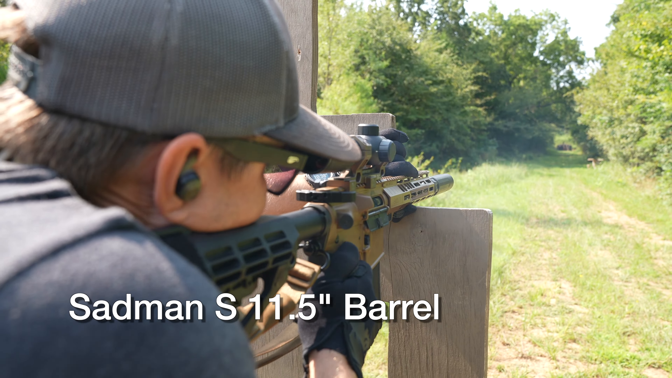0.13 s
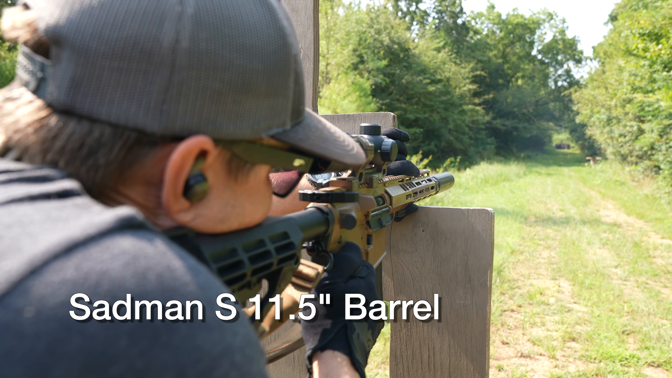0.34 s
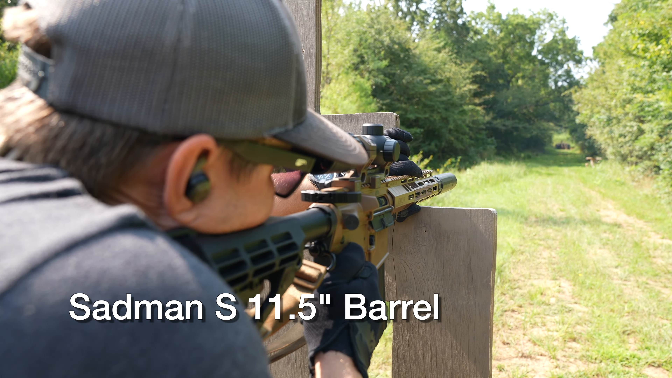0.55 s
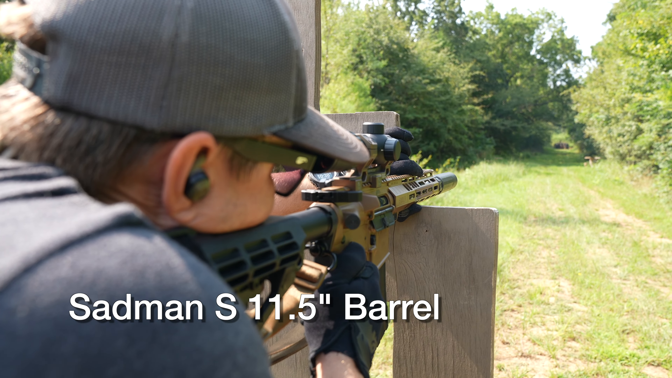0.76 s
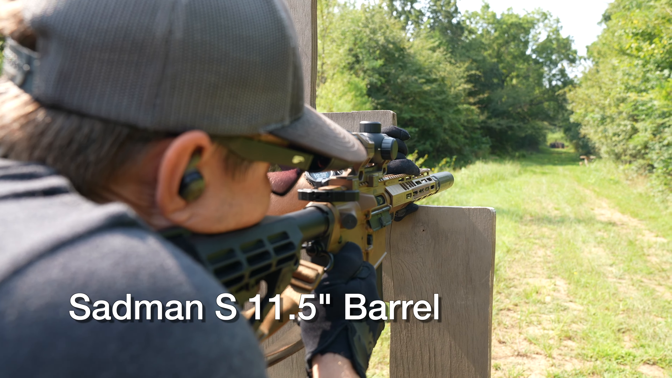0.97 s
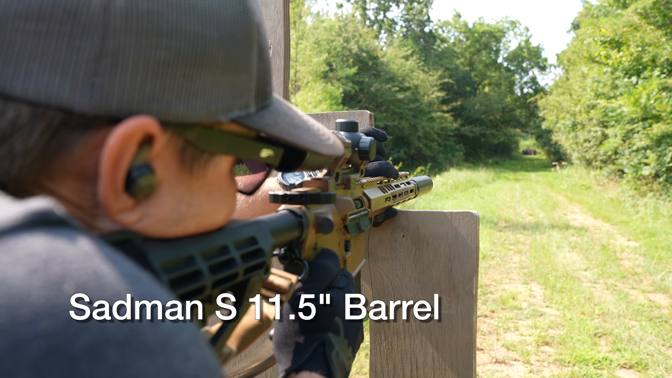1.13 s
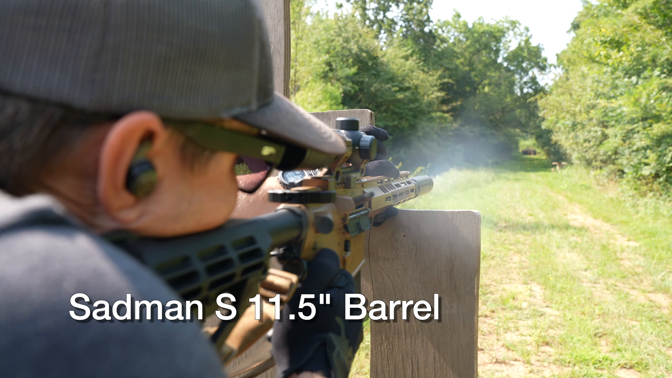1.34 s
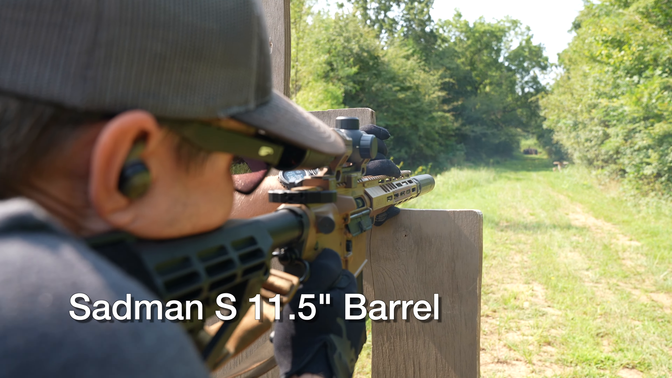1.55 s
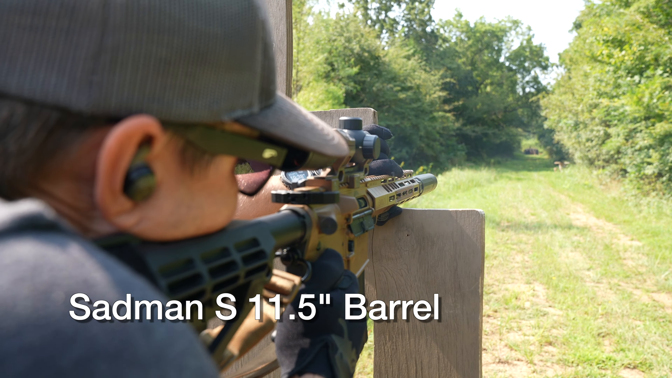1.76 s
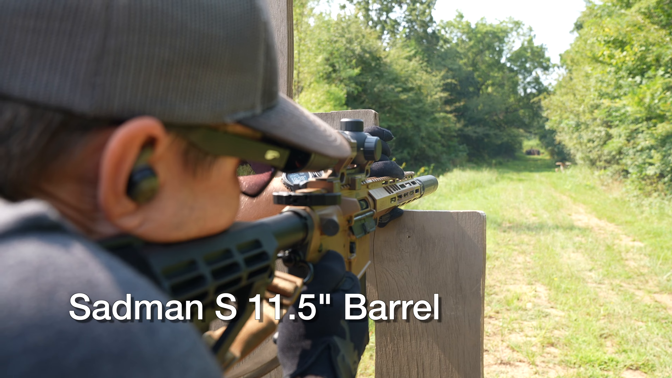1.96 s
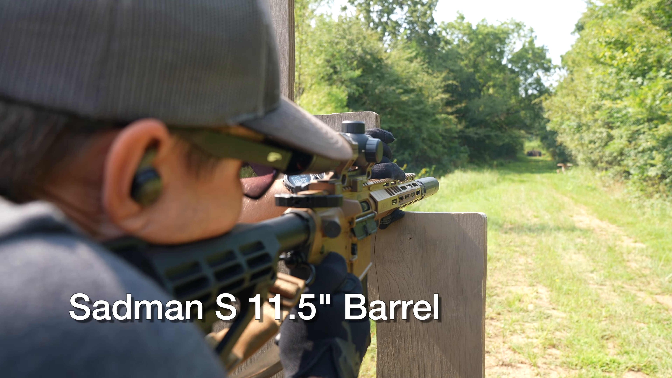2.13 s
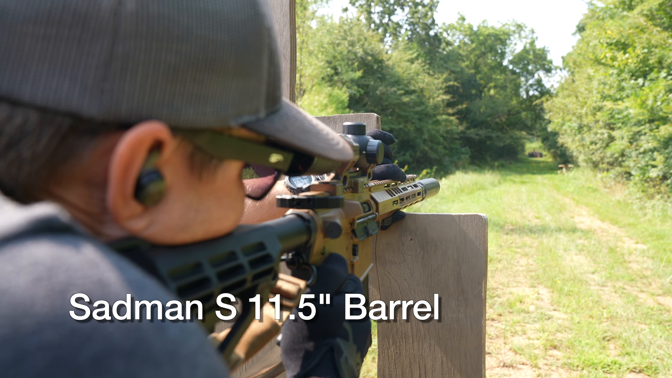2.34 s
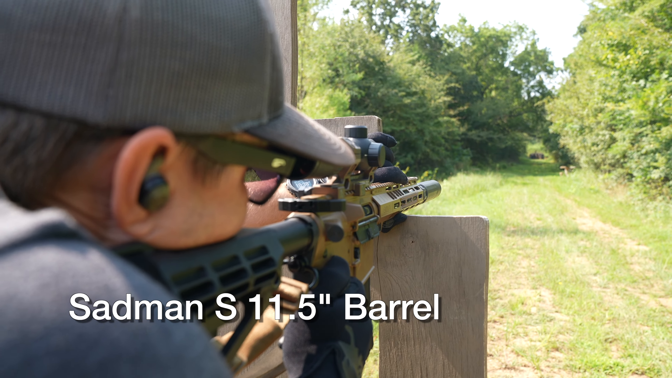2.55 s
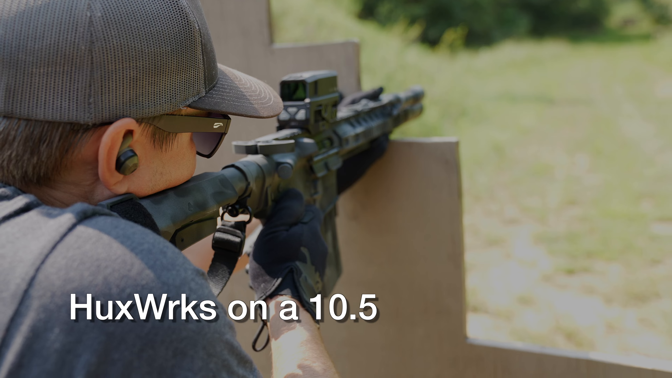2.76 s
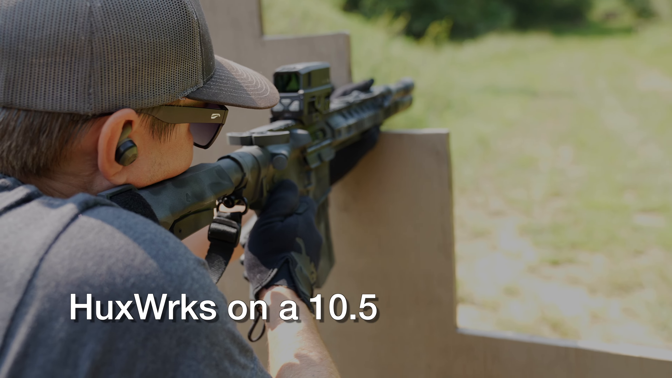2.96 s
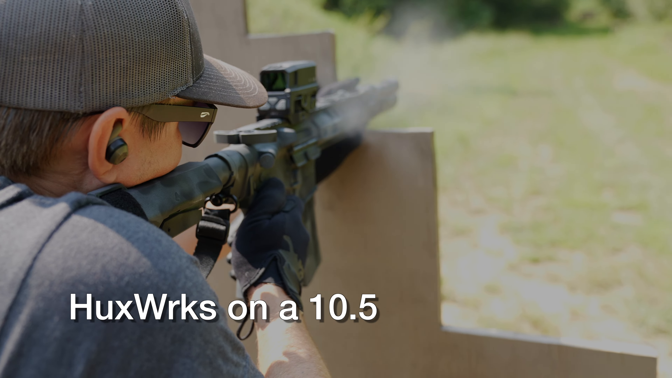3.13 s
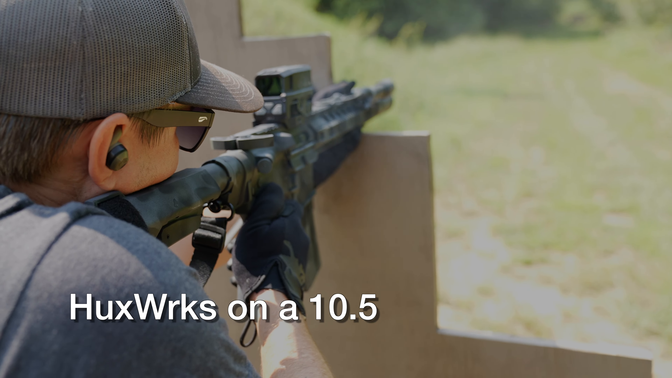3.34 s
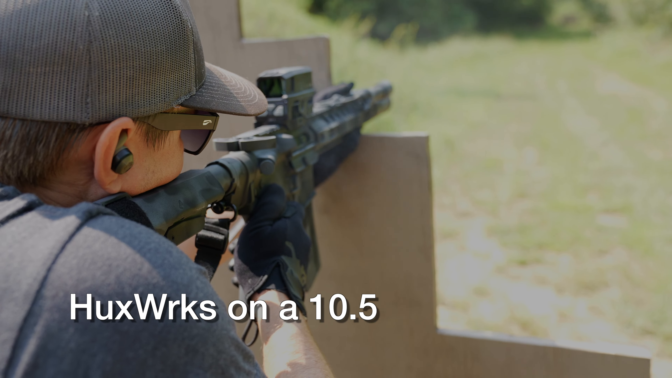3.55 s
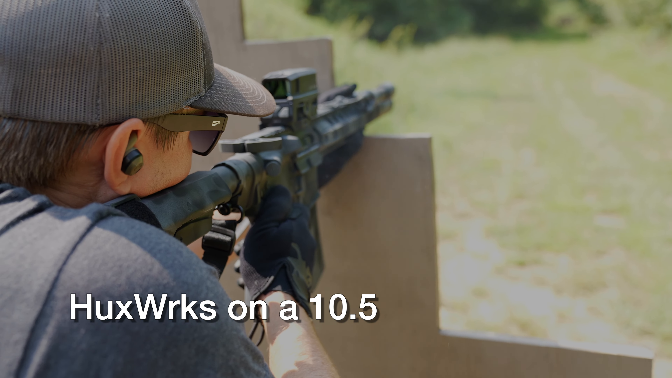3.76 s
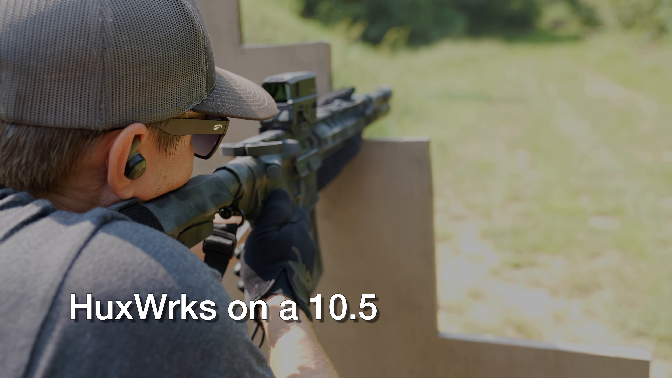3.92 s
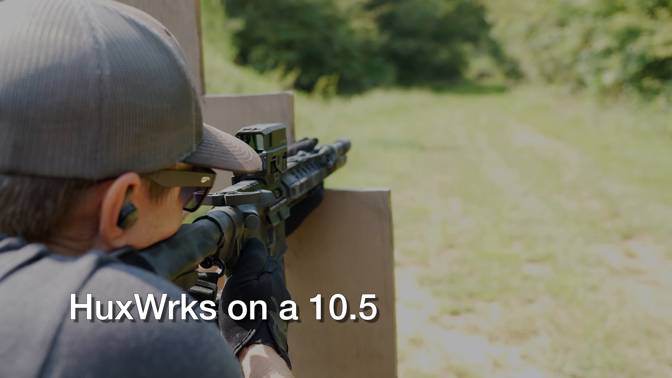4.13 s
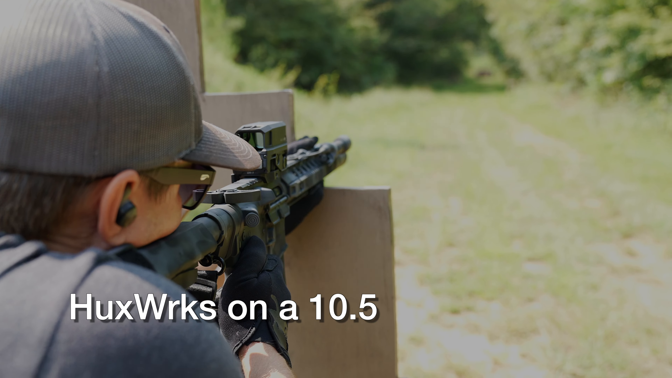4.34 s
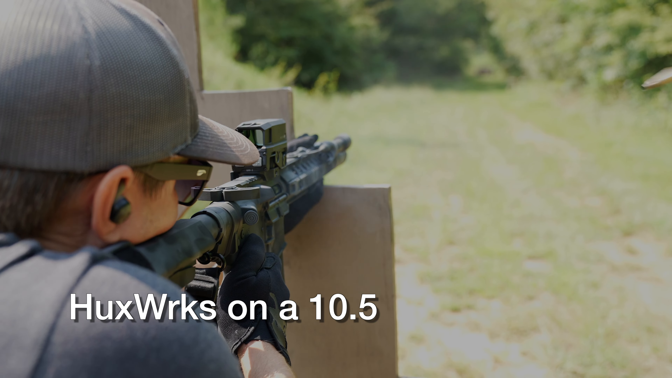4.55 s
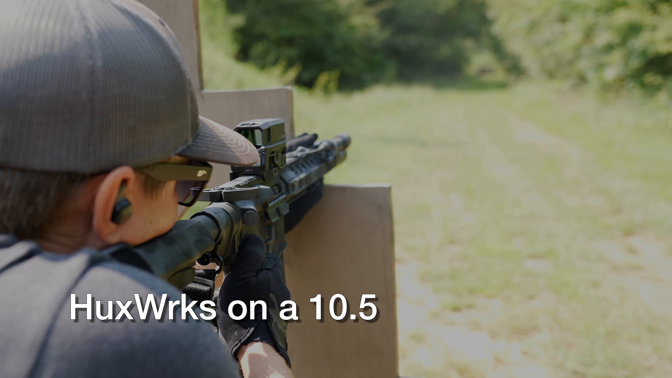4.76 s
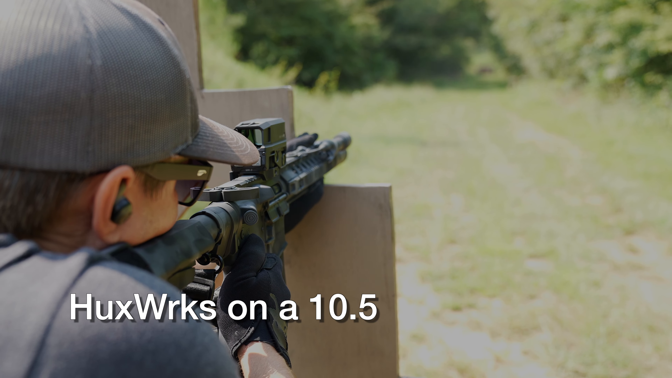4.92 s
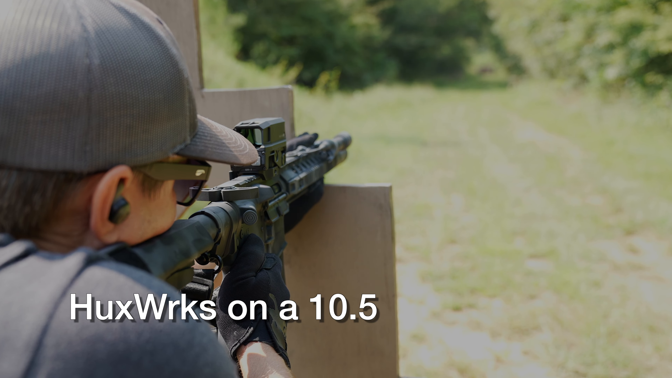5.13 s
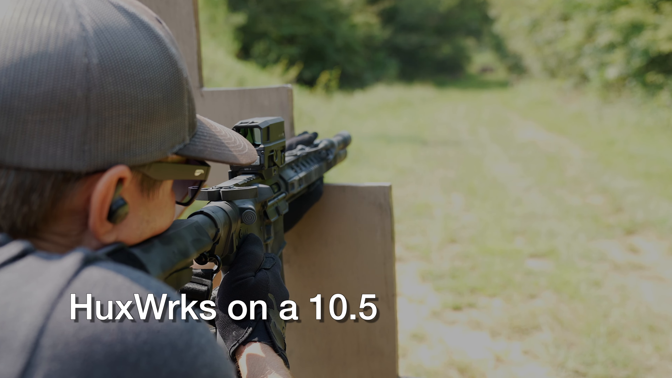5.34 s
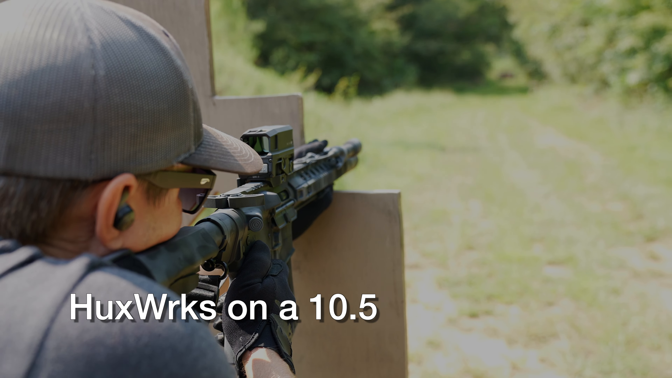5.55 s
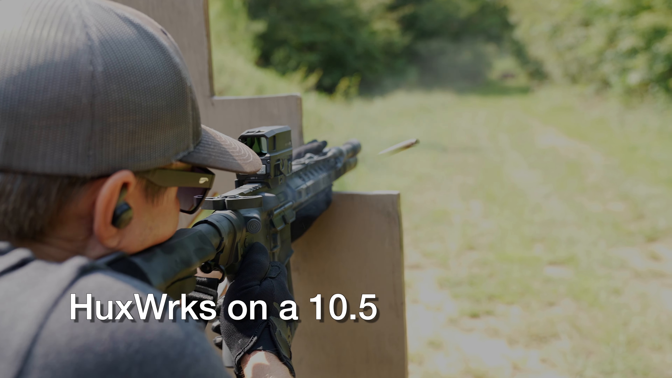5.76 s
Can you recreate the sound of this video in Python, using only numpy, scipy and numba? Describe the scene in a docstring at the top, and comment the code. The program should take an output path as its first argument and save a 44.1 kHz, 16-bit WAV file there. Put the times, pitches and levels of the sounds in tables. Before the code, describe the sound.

The tail of a shot is already hissing at the start, then a steel plate clangs. Four more sharp gunshots follow, over a second apart, each with a short thump and crackly tree echo; the next three echoes cut off abruptly. Plate hits answer all but the last. Mono, close, compressed microphone, thin insect buzz and light gusts.

```python
"""A suppressed rifle fires single shots on a grass range lined with trees; the first tail is already sounding.
After each blast, a burst of noise that saturates the microphone, the crack hisses back from the foliage.
A far steel plate then clashes and rings as a sum of decaying modes; past mid-scene a low rumble swells.
Insects and a little wind, both coloured noise, fill the pauses.
Automatic gain ducks under each blow and recovers in the tails."""
import sys
import numpy as np
from scipy import signal
from scipy.fft import rfft, irfft, next_fast_len
from scipy.io import wavfile
from numba import njit

SR = 44100
rng = np.random.default_rng(int(sys.argv[2]) if len(sys.argv) > 2 else 0)


def dump_mix(stems):
    """Bounce the given channels to the path in sys.argv[1] as a 16-bit WAV at rate SR."""
    frames = np.atleast_2d(stems).T  # one column per channel
    limited = np.clip(frames, -1, 1)  # hard clip at full scale
    pcm = np.round(limited * 32767).astype(np.int16)
    wavfile.write(sys.argv[1], SR, pcm)


N = 259734


def amp(db):
    """Decibel law: the amplitude ratio of a level in dB."""
    return 10 ** (np.asarray(db) / 20)


def unit(x):
    """Normalization: x scaled to an rms of 1."""
    return x / np.sqrt(np.mean(x ** 2) + 1e-20)


def clock():
    """Sampling: the time of every sample, in seconds."""
    return np.arange(N) / SR


def filtered(x, response):
    """Linear filtering: the spectrum of x times a gain that depends on frequency."""
    m = next_fast_len(N + 8192)
    gain = response(np.fft.rfftfreq(m, 1 / SR))
    return irfft(rfft(x, m) * gain, m)[:N]


def noise(spectrum, spiky_db=0):
    """Spectral shaping: noise of rms 1 in a given colour; spiky_db lets single impulses stand out."""
    frequency_hz, level_db = np.transpose(spectrum)
    impulses = rng.standard_normal(N) * amp(spiky_db * rng.standard_normal(N))

    def colour(hz):
        return amp(np.interp(np.log(hz + 1), np.log(frequency_hz), level_db))
    return unit(filtered(impulses, colour))


def fade(s, t60, attack):
    """Exponential decay: an envelope that rises from time s and falls 60 dB per t60 (all in s)."""
    age = np.maximum(clock() - s, 0)
    return (1 - np.exp(-age / attack)) * amp(-60 * np.minimum(age / t60, 5))


# colour of the wind: frequency_hz, level_db
WIND_COLOUR = [(20, 8.5), (45, -11.5), (80, -11.5), (120, -25), (250, -34.5), (700, -94)]
# colour of the low rumble: frequency_hz, level_db
RUMBLE_COLOUR = [(25, -1), (50, -16), (72, 2.5), (88, -2), (110, -29), (250, -51)]
# gusts on the microphone: centre_s, level_db, half_width_s
GUSTS = [(.38, -18, 0.12), (1.35, -35, 0.43), (2.83, -29, 0.094), (3.07, -17, 0.027), (3.35, -7.5, 0.25)]
BREEZE_DB = -30.5
RUMBLE_START_S, RUMBLE_END_S, RUMBLE_EDGE_S = 3.28, 4.14, 0.14
RUMBLE_DB, RUMBLE_SAG_DB_PER_S = -15.5, 10.5


def wind():
    """Turbulence noise: a light breeze with bell-shaped gusts, and one low rumble that swells and sinks."""
    t = clock()
    gusts = sum(amp(db) * np.exp(-((t - s) / width) ** 2) for s, db, width in GUSTS)
    strength = amp(BREEZE_DB) + gusts
    held = np.clip(np.minimum(t - RUMBLE_START_S, RUMBLE_END_S - t) / RUMBLE_EDGE_S, 0, 1)
    swell = held * amp(RUMBLE_DB - RUMBLE_SAG_DB_PER_S * (t - RUMBLE_START_S))
    return strength * noise(WIND_COLOUR) + swell * noise(RUMBLE_COLOUR)


# colour of the insect chorus: frequency_hz, level_db
INSECT_COLOUR = [(200, -22), (900, -21), (2000, -29.5), (2700, -13), (3400, 2.5), (4200, -6), (6000, -4.5),
                 (7700, -4), (9000, -16), (10500, -28), (13000, -23), (16000, -40)]
# colour of leaves and woods: frequency_hz, level_db
LEAF_COLOUR = [(60, -31), (150, -3), (400, -0.5), (800, 4.5), (1400, 8), (2200, -5.5), (5000, -31)]
# faint dull clicks as an echo stops: start_s, level_db
CLICKS = [(1.083, -33), (2.75, -30)]
# background levels, which change abruptly as each echo is cut short:
# end_s, chorus_level_db at the stretch's start, leaf_level_db
STRETCHES = [(1.085, -33.5, -61), (2.751, -31.5, -73), (4.168, -31, -64.5), (5.551, -35.5, -46.5),
             (5.9, -34, -44.5)]
CHORUS_FALL_DB_PER_S = 2.03  # the background chorus level falls a little through each stretch


def meadow():
    """Superposition of many small sources: insects and leaves as coloured noise, with faint clicks."""
    t, insects, leaves = clock(), noise(INSECT_COLOUR), noise(LEAF_COLOUR)
    clicks = sum(amp(db) * fade(s, t60=0.016, attack=0.00033) for s, db in CLICKS)
    out = noise(LEAF_COLOUR) * clicks
    start = 0
    for end, chorus_db, leaf_db in STRETCHES:
        chorus = amp(chorus_db - CHORUS_FALL_DB_PER_S * (t - start)) * insects
        out += (chorus + amp(leaf_db) * leaves) * ((t >= start) & (t < end))
        start = end
    return out


# the plate's modes: pitch_hz
MODE_HZ = [1475, 2713, 3135, 3569, 4168, 4381, 4463, 4962, 5367, 6025, 6648, 6756, 6928, 7171, 7590, 8236,
           9049, 9152, 10060, 10250, 10680, 11540, 12280, 13200, 13800, 14544]
# how they ring, in the same order: level_db, t60_s
MODE_DECAYS = [(-20, 0.29), (-4.5, 0.37), (-5.5, 0.21), (8, 0.13), (2, 0.29), (0, 0.26), (-4, 0.21),
               (7, 0.19), (2, 0.19), (-9, 0.2), (-2, 0.17), (-13, 0.29), (-11, 0.27), (1, .18),
               (-2.5, 0.23), (-3, 0.17), (-3, 0.26), (-16, 0.22), (-11.5, 0.3), (-12, 0.19), (-15, 0.31),
               (-19, 0.34), (-17, 0.28), (-17, .26), (-25, 0.22), (-17, .23)]
MID_MODE_HZ = 4000  # the pitch about which a blow's brightness tilts the modes
# the plate swings on its hanger, so each mode swells and sinks; the spread is a share of the rate
SWING_DB, SWING_HZ, SWING_SPREAD = 3.5, 7, .4


def ring(brightness_db, favoured_hz, favour_db, build_up, bloom_hz=5000, scatter_db=2):
    """Modal synthesis: a struck plate sounds as decaying sines, and the favoured modes stand out."""
    age = np.arange(SR * 3 // 4) / SR
    out = np.zeros(len(age))
    favoured = [min(MODE_HZ, key=lambda hz: abs(hz - near)) for near in favoured_hz]
    for hz, (db, t60) in zip(MODE_HZ, MODE_DECAYS):
        phase, side = rng.uniform(0, 2 * np.pi, 2)
        swing_hz = SWING_HZ * (1 + SWING_SPREAD * rng.uniform(-1, 1))
        struck_db = db + brightness_db * np.log2(hz / MID_MODE_HZ)
        struck_db += favour_db * (hz in favoured) + scatter_db * rng.standard_normal()
        lobes_db = SWING_DB * np.sin(2 * np.pi * swing_hz * age + side)  # the swing turns each mode's lobes
        rise_s = build_up * np.sqrt(hz / bloom_hz)  # energy reaches the high modes last
        rise = (1 - np.exp(-age / rise_s)) ** 2
        level = amp(struck_db + lobes_db - 60 * age / t60)
        out += rise * level * np.sin(2 * np.pi * hz * age + phase)
    return out


# colour of struck metal, also heard in the rifle's hammer: frequency_hz, level_db
METAL_COLOUR = [(100, -9), (1000, -12.5), (2000, -3.5), (3200, 0), (5000, -7), (9000, -17.5), (16000, -36)]
# colour of the clang scattered by the trees: frequency_hz, level_db
PLATE_ECHO_COLOUR = [(60, -26), (150, -8), (400, -2), (1200, 10.5), (2000, 9), (3300, 2.5), (6000, -7),
                     (12000, -32)]
# bullets reach the plate, and once it swings back against its hanger; the spot struck favours two modes:
# start_s, clash_level_db, clash_t60_s, ring_level_db, brightness_db_per_octave,
# favoured_pitch_hz, second_favoured_pitch_hz, favour_gain_db, build_up_s, echo_level_db
HITS = [(0.6448, 19.5, .019, 1, -0.5, 2713, 4381, 10.5, 0.065, -17.5),
        (2.1035, 12.5, 0.019, -9.5, -2, 4168, 4463, 4, 0.031, -19.5),
        (2.159, -7, 0.022, -20, -5, 2713, 4463, 16.5, 0.011, -33),
        (3.9018, 5.5, 0.06, -15.5, -6, 2713, 6928, 13.5, 0.019, -12.5),
        (5.1807, 12, 0.026, -11, -5, 3135, 10250, 14, 0.035, -13.5)]
# sharp ticks just ahead of the plate's clang: start_s, level_db
TICKS = [(0.642, 0), (2.1002, -5), (3.8964, 3.5), (5.177, -9)]


def plate():
    """Impact excitation: a bullet clashes on steel, the modes build up and ring, the trees scatter the clang."""
    out = np.zeros(N)
    clash, scatter = noise(METAL_COLOUR), noise(PLATE_ECHO_COLOUR)
    for s, clash_db, t60, ring_db, brightness_db, *favoured_hz, favour_db, build_up, echo_db in HITS:
        out += amp(clash_db) * clash * fade(s, t60=t60, attack=0.0072)
        out += amp(echo_db) * scatter * fade(s, t60=0.52, attack=0.0033)
        start = round(s * SR)
        tone = ring(brightness_db, favoured_hz, favour_db, build_up)
        out[start:start + len(tone)] += amp(ring_db) * tone[:N - start]
    for s, db in TICKS:
        out += amp(db) * clash * fade(s, t60=0.011, attack=0.00057)
    return out


# the crack returns from ever farther trees, weaker and duller
SPREAD_DB_PER_S, TREBLE_DB, DULLING_DB_PER_S = 23, 11.5, 29.5
# the echo's first moments are extra bright and harsh
EARLY_TREBLE_DB, EARLY_S = 17.5, 0.032
# where the tree line ends the echo falls away, and the woods behind it fade on
TREE_LINE_S, EDGE_S, EDGE_DB, BEYOND_DB_PER_S = .53, 0.19, 8.5, 25


def tree_line(age):
    """Spreading and absorption: level and treble (dB) of the crack that returns age seconds after the shot."""
    early, beyond = np.exp(-age / EARLY_S), np.maximum(age - TREE_LINE_S, 0)
    edge_db = EDGE_DB * np.minimum(beyond / EDGE_S, 1) + BEYOND_DB_PER_S * beyond
    level_db = -SPREAD_DB_PER_S * age - edge_db
    treble_db = TREBLE_DB + EARLY_TREBLE_DB * early - DULLING_DB_PER_S * age
    return level_db, treble_db


# colour of the returning crack: frequency_hz, level_db
CRACK_COLOUR = [(60, -19.5), (300, -19), (600, -12.5), (1100, -5), (2000, -3), (2900, -0.5), (3400, 4),
                (4100, -3.5), (6000, -11), (9000, -24), (16000, -31)]
# colour of the boom, in its echo and at the rifle: frequency_hz, level_db
BOOM_COLOUR = [(30, -22), (80, 12), (130, 6), (260, 4), (500, 5), (950, 6), (1300, -16), (3500, -11),
               (12000, -58)]
# larger obstacles return the boom: delay_s after the shot, level_db re the echo's bass
OBSTACLES = [(0.102, -10.5), (0.306, -18.5)]
ROLL_DB, ROLL_T60_S = -15, 2.175  # the far woods, before each shot's echo level is applied


def foliage(bass_hz=650, treble_hz=7000, crack_db=2, clump_db=0.82):
    """Diffuse scattering: leaves and trunks return tiny cracks; longer paths lose treble, far woods roll."""
    cracks, boom, woods = noise(CRACK_COLOUR, spiky_db=4.0), noise(BOOM_COLOUR), noise(LEAF_COLOUR)
    bass = filtered(cracks, lambda hz: 1 / (1 + (hz / bass_hz) ** 4))
    treble = filtered(cracks, lambda hz: 1 - 1 / (1 + (hz / treble_hz) ** 6))
    body, out, t = cracks - bass - treble, np.zeros(N), clock()
    for (s, *_, echo_db, bass_db), (end, *_) in zip(SHOTS, STRETCHES):
        level_db, treble_db = tree_line(np.maximum(t - s, 0))
        bands = body + amp(bass_db) * bass + amp(treble_db) * treble
        echo = amp(crack_db + level_db) * bands
        echo += amp(ROLL_DB) * woods * fade(s, t60=ROLL_T60_S, attack=0.79)
        for delay, db in OBSTACLES:
            echo += boom * amp(bass_db + db) * fade(s + delay, t60=0.12, attack=.005)
        out += amp(echo_db) * echo * ((t > s) & (t < end))
    clumps = unit(filtered(rng.standard_normal(N), lambda hz: np.exp(-hz / 90)))  # single trees stand out
    return out * amp(clump_db * clumps)


# colour of the muzzle blast: frequency_hz, level_db
BLAST_COLOUR = [(40, 2.5), (140, -21.5), (300, 7), (500, -5), (900, -3.5), (1500, -7.5), (3500, -14),
                (7000, -42), (16000, -10.5)]
# the shots: start_s at the muzzle, blast_level_db, boom_level_db, suction_level_db, suction_length_s,
# echo_level_db, echo_bass_db
SHOTS = [(-.115, 36, 6, 34, 0.096, 4, -1), (1.348, 37, 20.5, 32, .049, 3.5, 0),
         (3.1447, 46.5, 27, 40, 0.058, 3.5, 7.5), (4.424, 22, 18, 18, 0.041, 3, 6.5),
         (5.7059, 30.5, 28.5, 30.5, 0.035, 10, 8)]
HAMMER_DB, BLAST_T60_S = 13.5, 0.018


def rifle(lead=0.00602, hammer_attack=0.0048, bank_delay=0.016, bank_db=9):
    """Impulsive gas release: hammer falls, muzzle blasts, barricade booms, slow suction follows the gas."""
    steel, gas, wood, out = noise(METAL_COLOUR), noise(BLAST_COLOUR), noise(BOOM_COLOUR), np.zeros(N)
    for s, blast_db, boom_db, suction_db, length, *_ in SHOTS:
        out += amp(HAMMER_DB) * steel * fade(s - lead, t60=0.014, attack=hammer_attack)
        out += amp(blast_db) * gas * fade(s, t60=BLAST_T60_S, attack=0.0015)
        out += amp(boom_db) * wood * fade(s, t60=0.1, attack=0.00072)
        # the nearest surfaces answer first
        out += amp(bank_db) * steel * fade(s + bank_delay, t60=0.058, attack=0.012)
        progress = np.clip((clock() - s) / length, 0, 1)
        # a strong suction pins the microphone and mutes it briefly
        out -= amp(suction_db) * np.sin(np.pi * progress) * (1 - progress)
    return out


def scene():
    """Superposition: everything that reaches the one microphone."""
    return (rifle() + foliage() + plate() + meadow() + wind())[None]


@njit
def follow(size, start, attack, release):
    """Envelope detection: a level that rises quickly and sinks slowly (times in samples)."""
    out, level = np.empty_like(size), start
    for i in range(len(size)):
        level += (size[i] - level) / (attack if size[i] > level else release)
        out[i] = level
    return out


def clip(x, top, order):
    """Saturation: x bounded by +-top; a higher order is harder."""
    return x / (1 + np.abs(x / top) ** order) ** (1 / order)


GAIN_ATTACK_S, FULL_SCALE, TOP_HZ = .009, 1, 15500


def record(dry, rail_db=18, coupling_hz=20, target_db=-12, release=0.027):
    """Saturation and compression: the microphone limits, coupling drains the offset, gain levels, peaks clip."""
    mic = clip(dry[0], amp(rail_db), order=6)
    mic = signal.sosfilt(signal.butter(2, coupling_hz, "high", fs=SR, output="sos"), mic)
    size = np.abs(mic)
    level = follow(size, np.mean(size[:SR // 20]), GAIN_ATTACK_S * SR, release * SR)
    gain = clip(level + 1e-9, amp(target_db), order=4) / (level + 1e-9)  # near 1 when quiet, lower when loud
    out = clip(mic * gain, FULL_SCALE, order=8)
    return signal.sosfilt(signal.butter(16, TOP_HZ, fs=SR, output="sos"), out)[None]


dry = scene()
out = record(dry)
dump_mix(out)
```